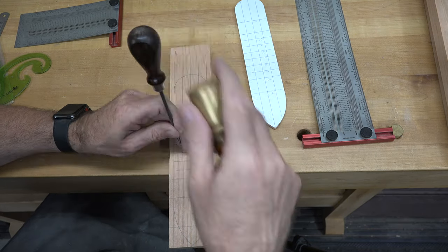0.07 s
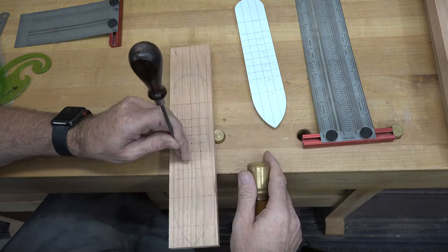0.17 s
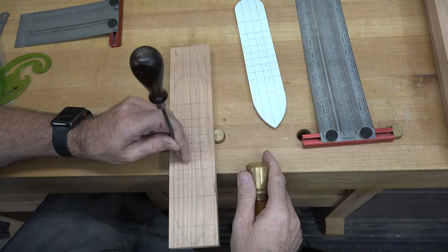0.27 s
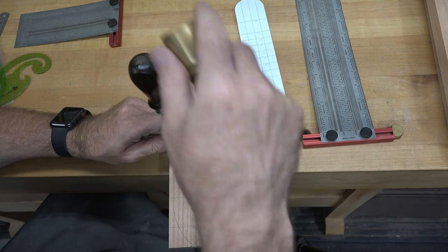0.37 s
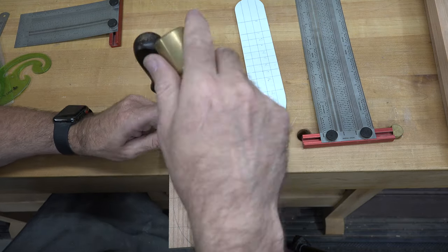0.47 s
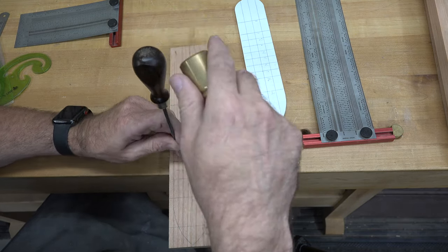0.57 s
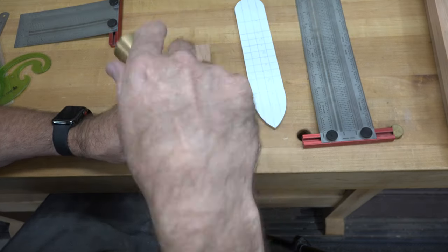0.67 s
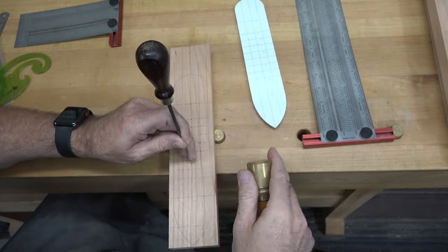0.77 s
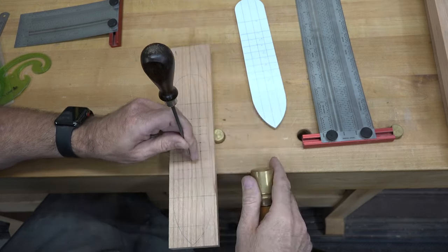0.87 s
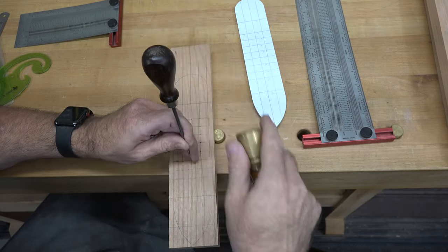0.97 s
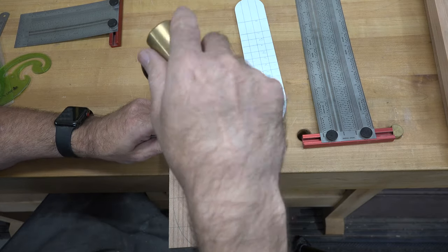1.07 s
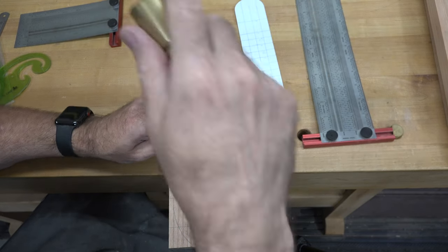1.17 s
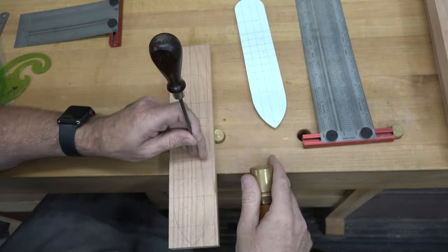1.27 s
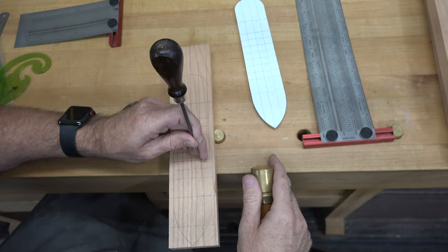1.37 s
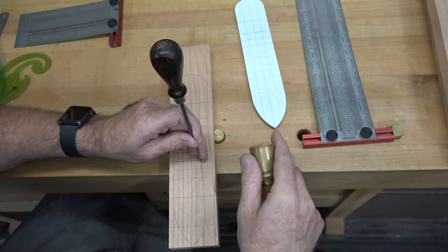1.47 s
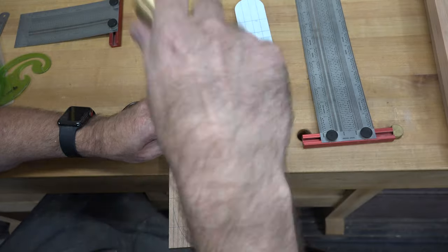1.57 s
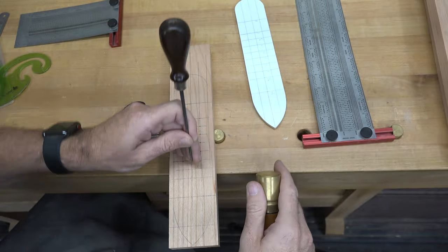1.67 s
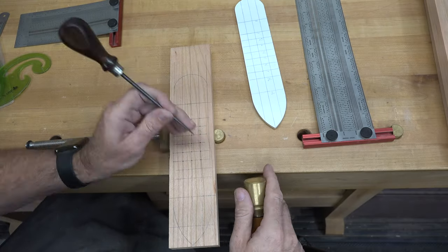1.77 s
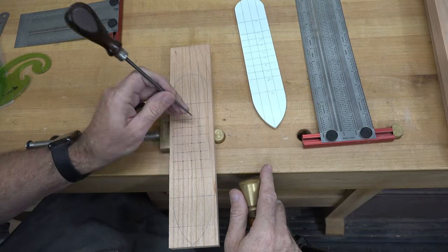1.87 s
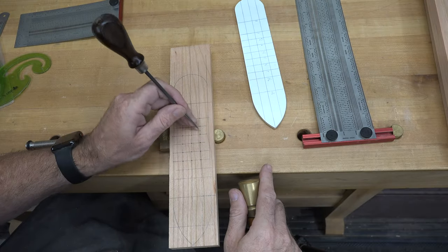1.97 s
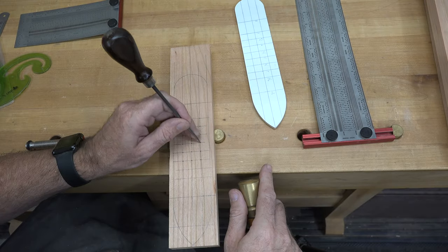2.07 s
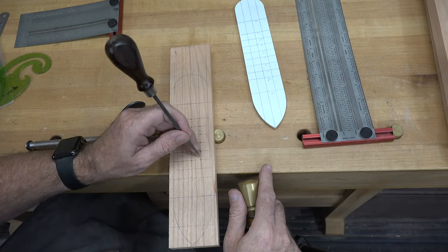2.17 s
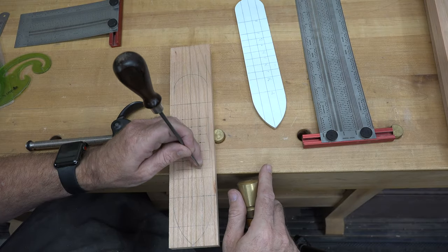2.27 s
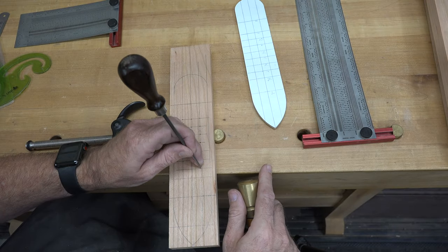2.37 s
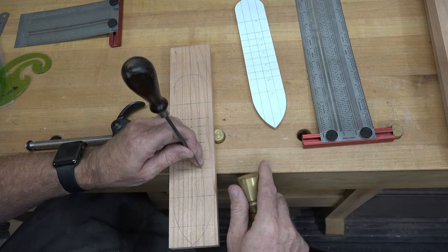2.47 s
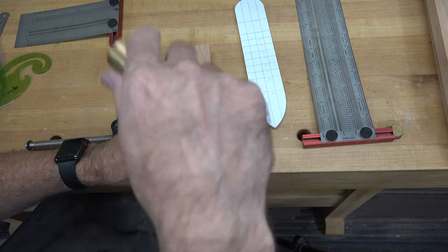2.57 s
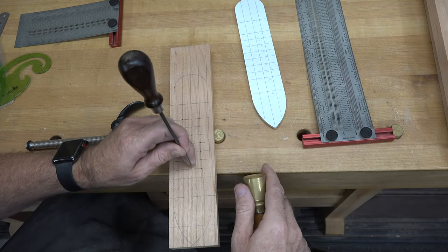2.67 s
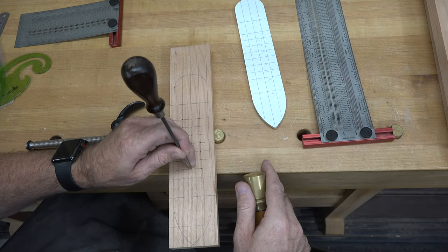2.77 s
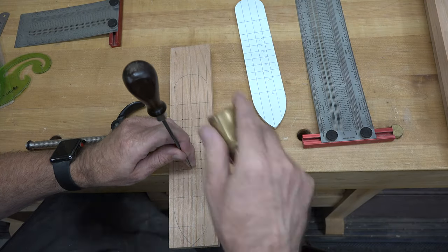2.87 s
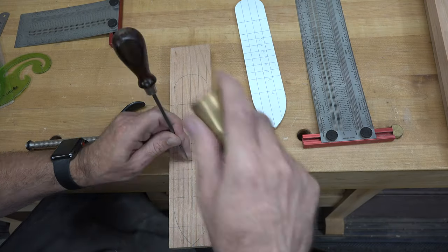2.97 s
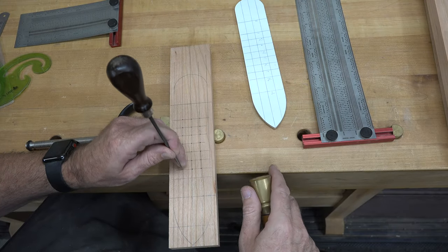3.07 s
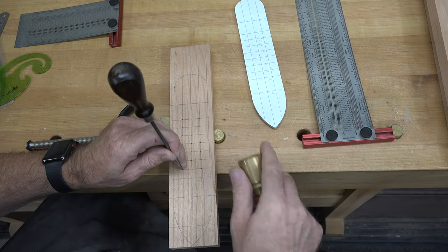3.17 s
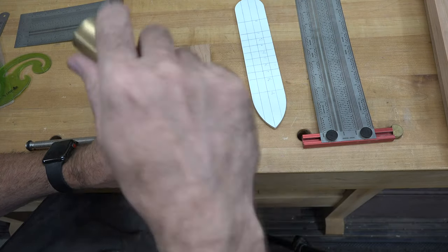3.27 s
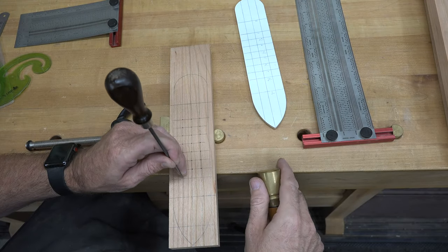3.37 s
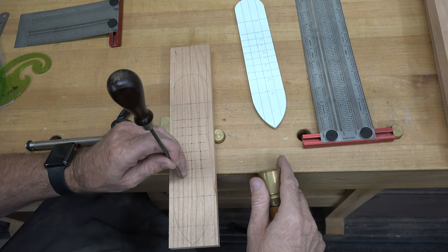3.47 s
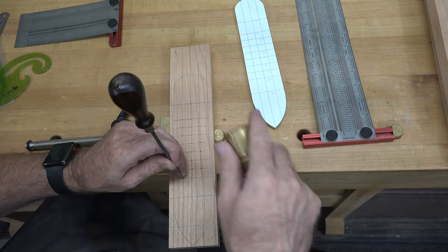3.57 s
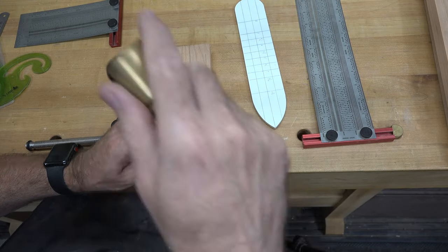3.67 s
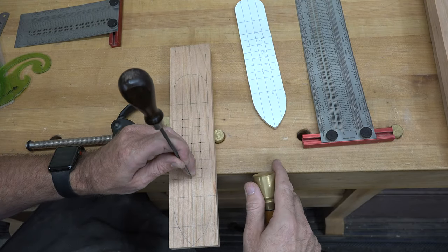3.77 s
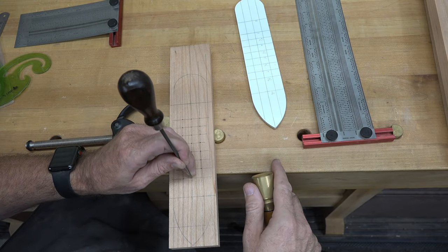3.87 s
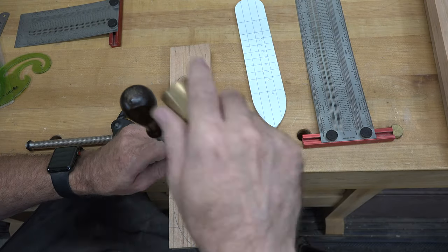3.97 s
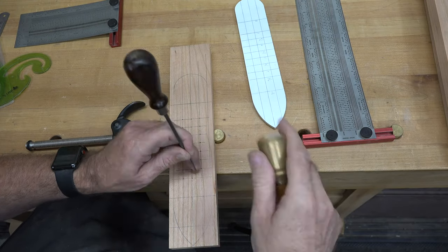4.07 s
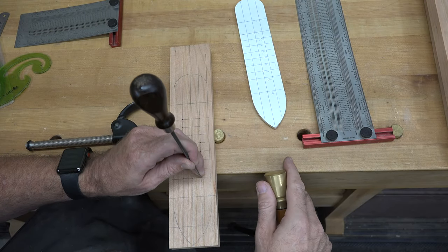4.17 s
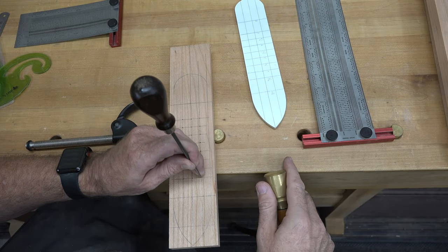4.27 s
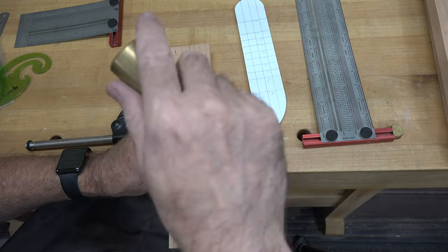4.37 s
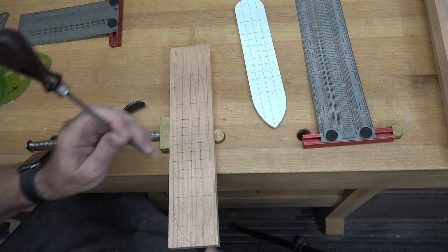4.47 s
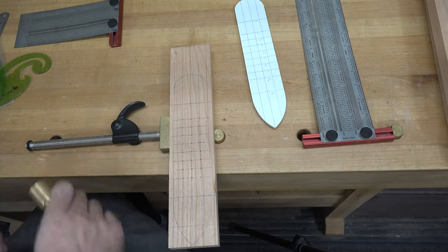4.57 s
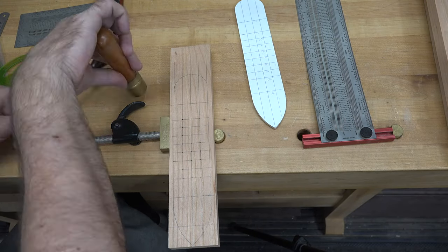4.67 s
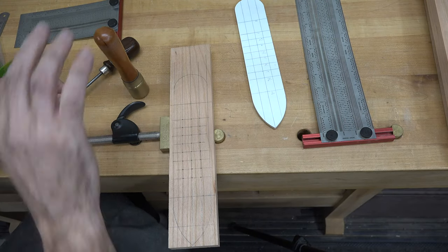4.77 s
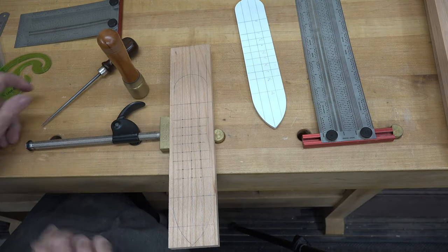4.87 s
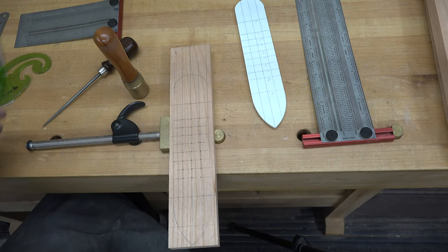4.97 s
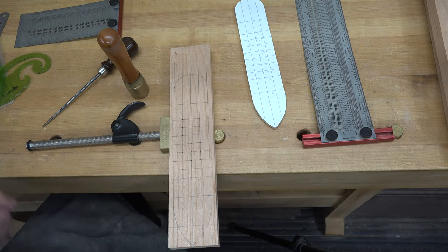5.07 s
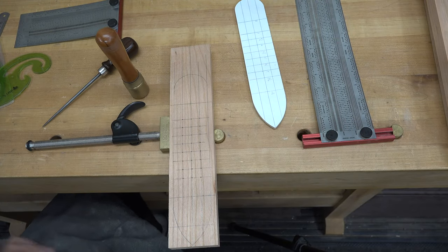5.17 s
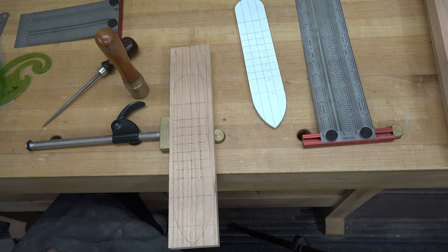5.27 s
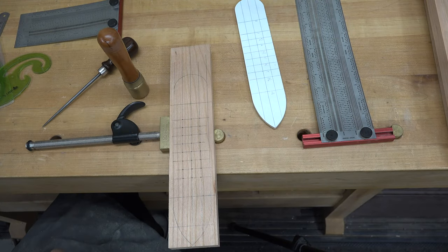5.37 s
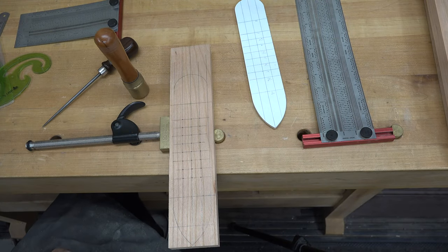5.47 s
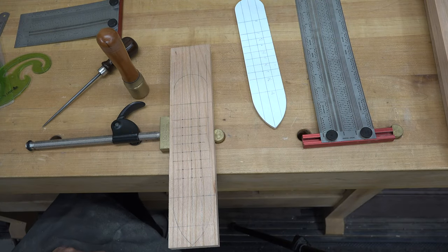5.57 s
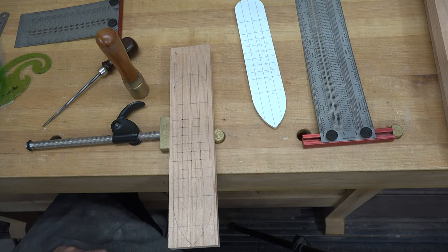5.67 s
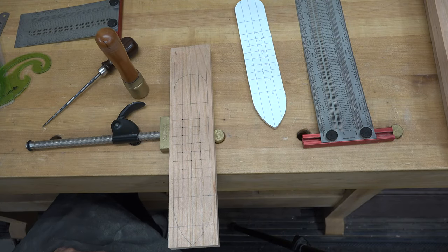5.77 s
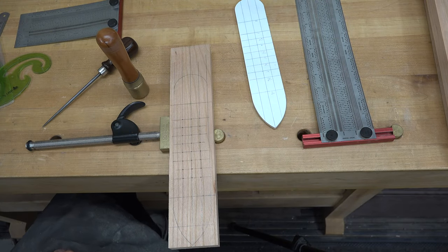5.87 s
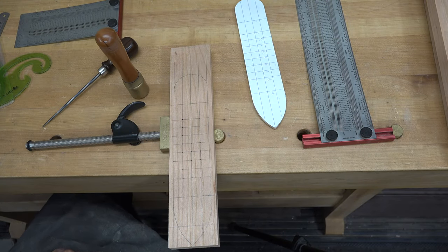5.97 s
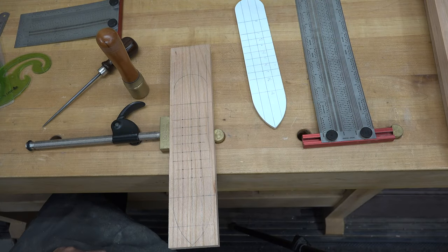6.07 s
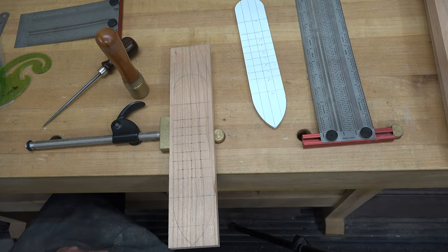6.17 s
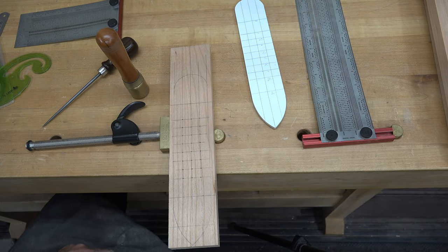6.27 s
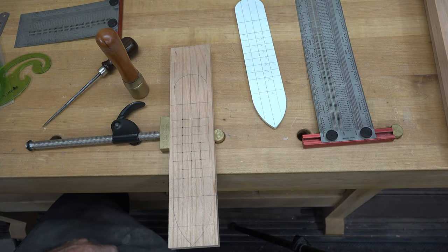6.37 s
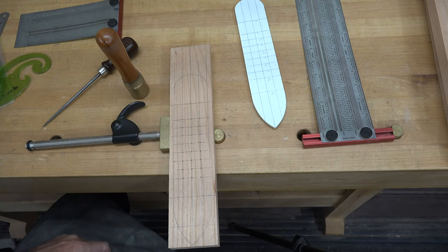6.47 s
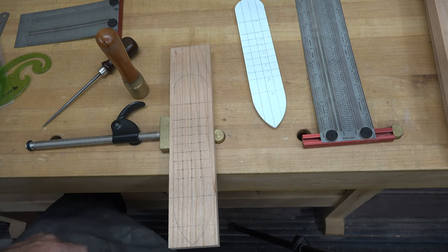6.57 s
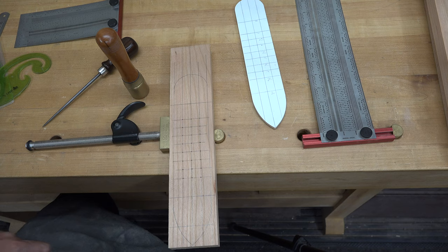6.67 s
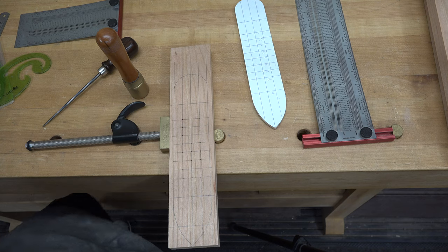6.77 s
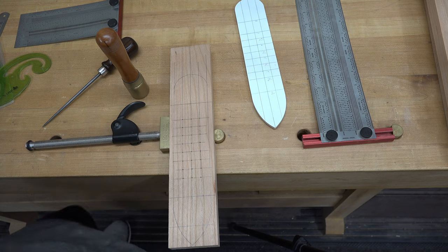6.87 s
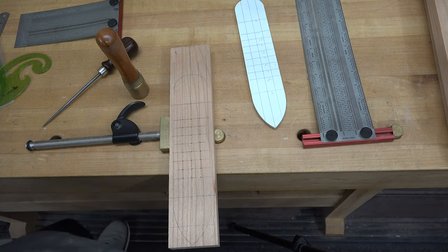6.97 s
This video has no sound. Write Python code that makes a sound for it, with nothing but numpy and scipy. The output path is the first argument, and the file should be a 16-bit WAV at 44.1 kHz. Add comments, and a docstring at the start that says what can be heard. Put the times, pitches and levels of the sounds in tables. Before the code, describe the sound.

Abrupt woody knocks with sharp cracks over faint shop hum, then a tumbling clatter of handles and ringing steel, followed by soft scuffs and cloth rustle.

```python
"""Mallet and awl on a workbench

A brass mallet taps a steel awl into a board: noise bursts ring the wood's modes behind a short crack. Time
runs in jumps, so blows are heard as slices that start late or break off. Then mallet and awl are laid down,
with knocks of shaped noise on the bench and clinks of fading sine tones in the steel, and the worker steps
back with scuffs and grainy cloth noise. Behind it all, wavering bands of noise make a quiet shop hum.
"""
import sys
import numpy as np
from scipy import signal
from scipy.fft import rfft, irfft, next_fast_len
from scipy.io import wavfile
from scipy.ndimage import uniform_filter1d

SR = 44100
rng = np.random.default_rng(int(sys.argv[2]) if len(sys.argv) > 2 else 0)


def generate_wav(sig):
    """Save sig (samples, or channels by samples) to the path in sys.argv[1] as 16-bit PCM at SR."""
    pcm = np.round(np.clip(np.atleast_2d(sig).T, -1, 1) * 32767).astype(np.int16)
    wavfile.write(sys.argv[1], SR, pcm)


N = 309073  # length in samples

# Slices of mallet blows; crack is relative to the slice, the last three shape its tone:
# start_s, level_db, hold_ms, crack_db, bass_db, treble_db, ring_near_5khz_db
BLOW_SLICES = [(0.1653, -37, 10, -25, -15, -17, 6), (.176, -22.5, 1.5, -21, -13, -10, 0),
               (.182, -16, 26, -11, -4, 15.5, 8), (0.2017, -33.5, 9, -21, 0, 15, 9),
               (.466, -39, 3, -15, -17, -8, -9), (0.4735, -25, 4.6, 11.5, -12.5, -15, -5),
               (0.5125, -22, 5, 10, -10.5, -6, 3), (0.5224, -29, 2, -20, -9.5, -5, -7),
               (0.8344, -37.5, 1.6, -18.5, -3.5, 8, -5), (1.2021, -21.5, 32, -8, 0.5, 5, 5.5),
               (1.318, -55, 16, -20, 4.5, -8, -5), (1.636, -31.5, 47.5, 0, 0.5, 1, 5.5),
               (1.781, -55.5, 5, -20, 2, 2.5, 5), (2.572, -59.5, 55, -21, 1, -18, -9),
               (2.623, -38.5, 53, -9, -0.5, 5, 6), (2.974, -32, .6, 16, -7, 10, -2),
               (2.9776, -16.5, 16, 9, -1, 9.5, -6), (3.099, -60, 45, -23, -4, 3, -7),
               (4.5569, -32, 3, -18, -6, 9, 6), (4.562, -28, 7.4, -19, -3, 14, 3.5),
               (4.711, -45.5, 5.4, 7, -3, 2, -9)]
# Times when the sound of a blow breaks off: time_s
BREAK_TIMES = [.2129, .5985, .8385, 1.4, 1.795, 2.772, 3.1665, 4.5686, 4.756]
# Faint taps on the board as the awl is set: start_s, level_db, bass_db
AWL_TAPS = [(3.325, -52.5, 0), (3.769, -55.5, 0), (4.202, -51, 9)]
# Ringing modes of the board, levels relative: pitch_hz, width_hz, level_db
BOARD_MODES = [(92.6, 59, 0.5), (196, 31, 7.5), (409, 37, 7.5), (642, 190, 2), (1280, 70, -3),
               (1617, 113, 5), (2483, 80, 0.5), (3006, 54, -2.5), (3420, 380, -7.5), (3844, 64, -4.5),
               (4590, 120, -3.5), (5160, 61, -1.5), (6670, 44, -26.5)]
# Broad tone of the board under its modes, relative: pitch_hz, level_db (per Hz)
BOARD_TONE = [(38, -33), (65, 3), (133, -1), (291, 1.5), (349, -3), (411, -4), (919, -11.5), (1600, -2.5),
              (2110, -7.5), (2530, -8.5), (5170, -12.5), (6220, -23), (13900, -49.5), (16000, -63)]
# Handles meeting and rocking on the bench top:
# start_s, level_db, t60_s, heard_ms, crack_db, bass_db, treble_db, ring_near_1500hz_db
HANDLE_KNOCKS = [(.7585, -48.5, 0.042, 79, -12, -21, -14, -9), (4.7595, -18.5, 0.19, 121, 6.5, 6, 5.5, 4.5),
                 (4.786, -27, 0.04, 45, -13, -4, 6, 6), (4.883, -45, 0.23, 27, -20, 28.5, 43.5, 6),
                 (4.903, -25.5, 0.11, 42, -19, -1, 1, -7), (4.93, -17.5, 0.065, 90, -12, -5, 9.5, 0.5),
                 (4.953, -19, 0.062, 60, -12, -2.5, -2, 0), (4.97, -22, 0.094, 59, -12, -3, 3, 3.5),
                 (4.986, -21, 0.086, 150, -12, -8.5, -15, -1), (5.003, -23, 0.069, 130, -12, 1, 4.5, -1.5),
                 (5.021, -28.5, 0.39, 110, -20, 2, -10, -5), (5.044, -36, 0.13, 120, -20, -15, -11, 0),
                 (5.07, -30.5, .35, 180, -20, 3, -11, 0)]
# Soft bumps and scuffs on wood:
# start_s, level_db, rise_ms, hold_ms, t60_s, bass_db, treble_db, ring_near_1500hz_db
SOFT_SCUFFS = [(1.98, -59, 5, 18, 0.22, 3, -22, 6), (2.27, -59, 18, 89, .05, -9.5, -13.5, 12),
               (5.365, -48, 3.9, 7, 0.17, 24, -7, -2), (5.954, -46.5, 33, 16, 0.27, -15, 17, -4),
               (6.129, -48.5, 5.3, 9, 0.27, 31, -11, -2), (6.225, -45.5, 5.4, 16, 0.26, 14, -4, -5),
               (6.925, -48, 3.2, 5.6, 0.12, 18, -9, -8)]
# Ringing modes of the bench, levels relative: pitch_hz, width_hz, level_db
BENCH_MODES = [(109, 27, -10.5), (209, 48, -5.5), (407, 75, 1), (593, 43, 0.5), (694, 23, 2),
               (803, 57, 4.5), (998, 98, 2.5), (1104, 30, -15), (1253, 72, 0.5), (1510, 11, 1.5),
               (1730, 21, -18), (2310, 110, -7), (2570, 44, -19)]
# Broad tone of the bench under its modes, relative: pitch_hz, level_db (per Hz)
BENCH_TONE = [(24, -77), (40, -17), (81, -20.5), (159, -13), (189, -22.5), (392, -6), (491, -7.5), (810, 5),
              (873, -4.5), (1720, -2), (3740, -26.5), (16000, -62)]
# The awl's steel shaft bouncing, levels relative: start_s, level_db, brightness_db_per_octave, scrape_db
SHAFT_BOUNCES = [(4.907, -25.5, -6, 4), (4.931, -34, -11, -15), (4.961, -24, -1, 7.5),
                 (5.0108, -10.5, 5.5, -1.5), (5.0554, -22, -5.5, -8), (5.0629, -16.5, 0, -5.5)]
# Bending modes of the shaft, levels relative: pitch_hz, level_db, t60_s
SHAFT_MODES = [(3204, -9, 0.29), (4580, -14, 0.054), (5440, -7.5, 0.27), (6320, -4, 0.044),
               (7350, -2, 0.12), (7700, -9, 0.11), (9560, -8, 0.1), (13100, -24, .05), (15620, -32, .09)]
# Sleeves and clothes moving without pause, one list per stretch, level before the grain: time_s, level_db
CLOTH_STRETCHES = [
    [(4.575, -54), (4.611, -55.5), (4.705, -57)],
    [(5.2, -55), (5.264, -58), (5.35, -55.5), (5.38, -52), (5.434, -58), (5.74, -63), (5.78, -72),
     (6.1, -70.5), (6.15, -59.5), (6.312, -59.5), (6.378, -56.5), (6.93, -55.5), (7.0, -53.5)],
]
# Brief rustles, low part relative to the middle part: peak_s, level_db, low_db
BRIEF_RUSTLES = [(3.348, -59.5, 3), (3.822, -62, 7.5), (3.974, -79, 12), (4.078, -69, 5), (4.3, -76, 22),
                 (6.003, -54, -7)]
# Tone of the shop hum, relative: pitch_hz, level_db (per Hz)
SHOP_TONE = [(15, -19), (25, 1), (55, 3.5), (153, -10), (256, -8), (293, -11.5), (373, -10.5), (405, -18),
             (607, -18), (734, -17.5), (1020, -11), (1520, -20.5), (1700, -26), (7920, -29), (16000, -31)]
# Side sound compared with middle sound, for near sounds: pitch_hz, gain_db
NEAR_WIDTH = [(60, -24.5), (110, -23), (200, -22), (380, -25), (700, -25), (1290, -23.5), (2380, -21.5),
              (4400, -21.5), (8120, 3.5), (15000, -15.5)]
# Side sound compared with middle sound, for shop and cloth: pitch_hz, gain_db
SHOP_WIDTH = [(60, -26), (110, -12.5), (200, -10.5), (380, -10.5), (700, -9.5), (1290, -13), (2380, -25),
              (4400, -19), (8120, 3.5), (15000, -15)]

# t60 is the time to fade by 60 dB
SHOP_DB = -55  # rms before the stereo spread
ROOM_DB, ROOM_T60_S = -28, 0.97  # the shop's echo after each hit on wood
SHOP_LEFT_DB = 0.55  # left above right
TREBLE_LEFT_DB, TREBLE_LEFT_HZ = 1, 2500  # near sounds lean left in the treble
BLOW_RISE_MS = 0.45
# blow t60 at -21 dB; it doubles for each 15.5 dB fainter, up to the longest
BLOW_T60_S, T60_DOUBLES_DB, LONGEST_T60_S = 0.21, 15.5, 0.37
TAP_RISE_MS, TAP_HOLD_MS, TAP_T60_S = 1.8, 6.7, 0.06
KNOCK_RISE_MS, KNOCK_HOLD_MS = 0.33, 4.6
SOFT_CRACK_DB, SOFT_HEARD_MS = -22, 240  # for taps and scuffs
RUSTLE_DB_PER_S, RUSTLE_BRIGHT_DB = 126, -9  # fall either side of the peak; bright part
CLOTH_LOW_DB, CLOTH_BRIGHT_DB = 2, -5
BASS_CUT_HZ, TOP_HZ, PEAK = 42, 15850, 0.55


def undb(db):
    """Turn decibels into gain."""
    return 10 ** (np.asarray(db) / 20)


def unit(x):
    """Scale to rms 1."""
    return x / np.sqrt(np.mean(x ** 2))


def along(points, hz):
    """Read (pitch_hz, level_db) points on a log-frequency axis."""
    at, db = np.transpose(points)
    return np.interp(np.log(hz + 1), np.log(at), db)


def colour(x, db_of):
    """Filter x to the gain db_of(hz) without pre-echo, using a minimum-phase response."""
    size = next_fast_len(x.shape[-1] + 4096)
    log_gain = db_of(np.fft.rfftfreq(size, 1 / SR)) * np.log(10) / 20
    # folding the cepstrum forward gives each gain its matching phase
    cepstrum = irfft(log_gain, size)
    cepstrum[..., 1:size // 2] *= 2
    cepstrum[..., size // 2 + 1:] = 0
    response = np.exp(rfft(cepstrum))
    return irfft(rfft(x, size) * response, size)[..., :x.shape[-1]]


def walk(rate):
    """Make random levels, rate new ones per second, smoothed twice."""
    k = int(SR / rate)
    steps = np.repeat(rng.standard_normal(N // k + 1), k)
    return uniform_filter1d(uniform_filter1d(steps, k), k)[:N]


def add(out, s, pair):
    """Mix a middle and side pair in at time s."""
    i = int(s * SR)
    out[:, i:i + pair.shape[1]] += pair[:, :N - i]


def place(pair, side_points, pan_db, treble_db=0):
    """Make left and right from a middle sound and an unrelated side sound."""
    middle = pair[0]
    side = colour(pair[1], lambda f: along(side_points, f))
    both = np.array([middle + side, middle - side])
    half = np.array([[0.5], [-0.5]])  # half the lean goes to each ear

    def lean_db(f):
        return half * (pan_db + treble_db / (1 + (TREBLE_LEFT_HZ / (f + 1)) ** 2))
    return colour(both, lean_db)


def shop(flicker_db=-0.5):
    """Room hum and hiss: noise in overlapping octave bands that swell together and flicker alone."""
    noise = rfft(colour(rng.standard_normal((2, N)), lambda f: along(SHOP_TONE, f)))
    octave = np.log2(np.fft.rfftfreq(N, 1 / SR) / 32 + 1e-9)  # octaves above 32 Hz
    swell_db = 0.6 * walk(1.5)
    out = 0
    for k in range(10):
        window = np.cos(np.pi / 2 * np.clip(octave - k, -1, 1)) ** 2
        band = irfft(noise * window, N)
        # the bass wavers most
        out = out + band * undb(swell_db + flicker_db * walk(5.9) / (1 + k / 3))
    return unit(out) * undb(SHOP_DB)


def cloth():
    """Rubbing cloth: soft grainy noise in a middle, a low and a bright part."""
    t, out = np.arange(N) / SR, 0
    grain = undb(1.2 * walk(150))
    tones = ([(500, -18.0), (1400, 0), (3500, -6), (7000, -22.5)],
             [(60, 7.5), (250, 0.0), (1000, -1), (2500, -34.0)],
             [(2500, -6), (5000, 0), (9000, -10.0), (16000, -24)])
    middle, low, bright = (unit(colour(rng.standard_normal((2, N)), lambda f: along(tone, f)))
                           for tone in tones)
    moving = middle + undb(CLOTH_LOW_DB) * low + undb(CLOTH_BRIGHT_DB) * bright
    for rows in CLOTH_STRETCHES:
        s, db = np.transpose(rows)
        fade = np.clip(np.minimum((t - s[0]) / 0.035, (s[-1] - t) / 0.016) + 1, 0, 1)
        out = out + fade * undb(np.interp(t, s, db)) * moving
    for s, db, low_db in BRIEF_RUSTLES:
        rustle = middle + undb(low_db) * low + undb(RUSTLE_BRIGHT_DB) * bright
        out = out + undb(db - RUSTLE_DB_PER_S * abs(t - s)) * rustle
    return out * grain


def struck_wood(hits, modes, body, lift_db, grain_db, bass_hz, middle_hz, middle_db, thin, ring_hz,
                ring_width, treble_hz, crack_hz, edge, hard_hz, hard, pan_db):
    """Each hit is a crack and a dense rattle of echoes, coloured by the wood's modes and then cut off."""
    out, t = np.zeros((2, N)), np.arange(SR // 4) / SR  # no hit lasts beyond 0.25 s
    chance = rng.standard_normal((len(hits), 3, len(t)))
    above_body_db = [db - along(body, hz) for hz, _, db in modes]
    crack = -np.exp(-t * crack_hz * 1.6) * np.sin(2 * np.pi * crack_hz * t + edge)
    for hit, (mid, side, grain) in zip(hits, chance):
        s, db, rise, hold, t60, heard, crack_db, bass_db, treble_db, ring_db = hit

        def tone_db(f):
            # the strongest mode stands lift_db above the body
            peaks = sum(undb(2 * (d - max(above_body_db) + lift_db)) / (1 + (2 * (f - hz) / w) ** 2)
                        for (hz, w, _), d in zip(modes, above_body_db))
            bass = bass_db / (1 + (f / bass_hz) ** 4)
            treble = treble_db / (1 + (treble_hz / (f + 1)) ** 4)
            # the thinner the bass, the stronger the middle
            middle_bump = np.exp(-(np.log((f + 1) / middle_hz) / 0.35) ** 2)
            middle = (middle_db - thin * min(bass_db, 0)) * middle_bump
            ring_bump = ring_db * np.exp(-((f - ring_hz) / ring_width) ** 2)
            # the louder the hit, the more one strong mode stands out
            hardness = hard * (db + 27) / (1 + ((f - hard_hz) / 90) ** 2)
            return along(body, f) + 10 * np.log10(1 + peaks) + bass + treble + middle + ring_bump + hardness

        grain_gain = undb(grain_db * unit(uniform_filter1d(grain, size=40)))
        rattle = np.array([mid, side]) * grain_gain
        loud = np.sqrt(np.mean(colour(rattle[0], tone_db) ** 2))
        attack = np.minimum(1000 * t / rise, 1) ** 2
        decay = undb(-60 * np.maximum(t - (rise + hold) / 1000, 0) / t60)
        room = np.minimum(t / 0.025, 1) * undb(ROOM_DB - 60 * t / ROOM_T60_S)
        ring = colour(rattle * (attack * decay + room), tone_db) / loud
        ring[0] += undb(crack_db) * crack
        cut = np.clip((heard / 1000 - t) / 0.0008, 0, 1)
        add(out, s, place(ring * undb(db) * cut, NEAR_WIDTH, pan_db, TREBLE_LEFT_DB))
    return out


def bench_knocks():
    """Handles knock and scuff the bench top, which answers with its own wooden modes."""
    knocks = [(s, db, KNOCK_RISE_MS, KNOCK_HOLD_MS, *rest) for s, db, *rest in HANDLE_KNOCKS]
    scuffs = [(s, db, rise, hold, t60, SOFT_HEARD_MS, SOFT_CRACK_DB, *tone)
              for s, db, rise, hold, t60, *tone in SOFT_SCUFFS]
    return struck_wood(knocks + scuffs, BENCH_MODES, BENCH_TONE, lift_db=14.5, grain_db=-1.5, bass_hz=527,
                       middle_hz=1010, middle_db=0.6, ring_hz=1530, ring_width=270, thin=0.1,
                       treble_hz=2430, crack_hz=920, edge=1.35, hard_hz=950, hard=0.11, pan_db=-0.6)


def steel_shaft(scrape_t60=0.078, echo_t60=0.47, echo_db=-16, wobble_db=4.0, pan_db=0.0):
    """Each bounce rings the shaft's bending modes anew; a bright scrape and its echoes go with it."""
    out, t = np.zeros((2, N)), np.arange(SR // 3) / SR
    hz, db, t60 = np.transpose(SHAFT_MODES)[:, :, None]
    phases = rng.random((len(SHAFT_BOUNCES), 2, len(SHAFT_MODES), 1))
    noise = rng.standard_normal((len(SHAFT_BOUNCES), 2, len(t)))
    scrape_tone = [(2500, -16), (4500, 4), (8000, -0.5), (11000, -19.5), (16000, -17)]
    for (s, level_db, tilt_db, scrape_db), phase, hiss in zip(SHAFT_BOUNCES, phases, noise):
        # rocking on the bench damps and bends every mode unevenly
        wander = uniform_filter1d(rng.standard_normal((2, len(SHAFT_MODES), len(t))), size=220)
        touch, slip = unit(uniform_filter1d(wander, size=220))
        gain = undb(db + tilt_db * np.log2(hz / 6000) - 60 * t / t60 + wobble_db * touch)
        tones = gain * np.sin(2 * np.pi * (hz * t + phase + 0.049 * slip))
        ring = np.sum(tones, axis=1) * np.minimum(t / 0.0015, 1)
        scrape = colour(hiss, lambda f: along(scrape_tone, f) + tilt_db * np.log2((f + 1) / 6000))
        fade = undb(-60 * t / scrape_t60) + undb(echo_db - 60 * t / echo_t60)
        bounce = undb(-2) * ring + unit(scrape) * undb(scrape_db) * fade
        add(out, s, undb(level_db - 11.0) * bounce)
    # the side sound is 7 dB weaker before it is spread
    return place(out * undb([[0], [-7]]), NEAR_WIDTH, pan_db, TREBLE_LEFT_DB)


def blow_t60(db):
    """Fainter slices of a blow die away more slowly."""
    return min(BLOW_T60_S * 2 ** ((-21 - db) / T60_DOUBLES_DB), LONGEST_T60_S)


def board_blows():
    """Mallet blows and faint taps drive the awl into the board, ringing its wooden modes."""
    ends = BREAK_TIMES + [blow[0] for blow in BLOW_SLICES]
    hits = []
    for s, db, hold, *rest in BLOW_SLICES:
        # heard until the next slice starts or the sound breaks off
        heard_ms = 1000 * (min(end for end in ends if end > s) - s)
        hits.append((s, db, BLOW_RISE_MS, hold, blow_t60(db), heard_ms, *rest))
    for s, db, bass_db in AWL_TAPS:
        hits.append((s, db, TAP_RISE_MS, TAP_HOLD_MS, TAP_T60_S, SOFT_HEARD_MS, SOFT_CRACK_DB, bass_db, 0, 0))
    return struck_wood(hits, BOARD_MODES, BOARD_TONE, lift_db=7.5, grain_db=1.0, bass_hz=600,
                       middle_hz=3100, middle_db=1.5, ring_hz=4930, ring_width=240, thin=0.37,
                       treble_hz=6460, crack_hz=2440, edge=0.33, hard_hz=1680, hard=0.11, pan_db=0.54)


def scene():
    """Add up every source, left and right."""
    background = place(shop() + cloth(), SHOP_WIDTH, SHOP_LEFT_DB)
    return background + bench_knocks() + steel_shaft() + board_blows()


def record(dry):
    """The microphone drops the deepest bass; the recorder rounds the peaks and cuts the top."""
    bass_cut = signal.butter(3, BASS_CUT_HZ, "high", fs=SR, output="sos")
    mic = signal.sosfilt(bass_cut, dry)
    rounded = PEAK * np.tanh(mic / PEAK)
    top_cut = signal.ellip(10, 0.2, 70, TOP_HZ, fs=SR, output="sos")
    return signal.sosfilt(top_cut, rounded)


dry = scene()
out = record(dry)
generate_wav(out)
```